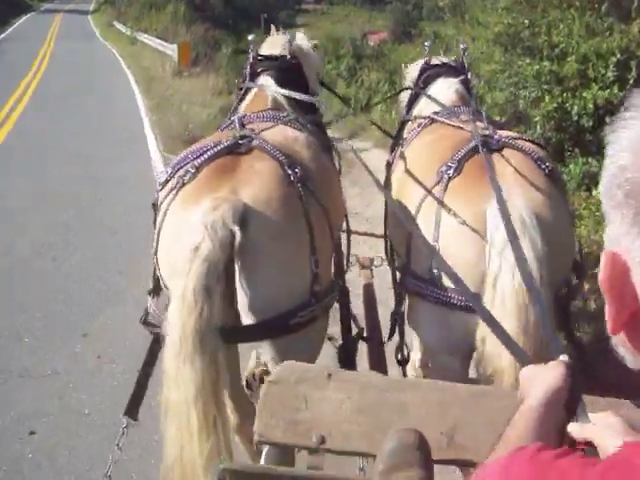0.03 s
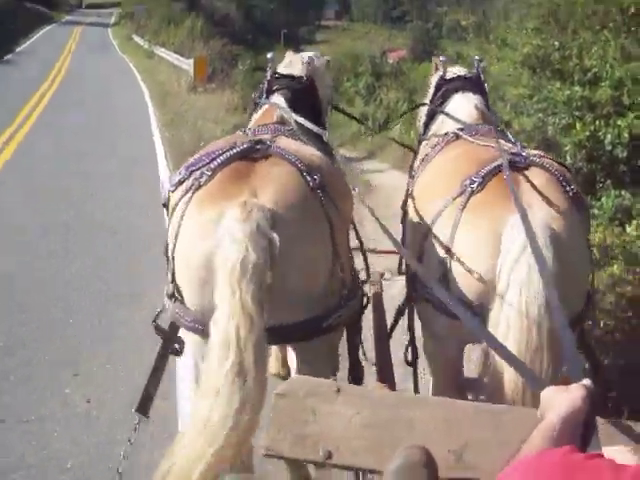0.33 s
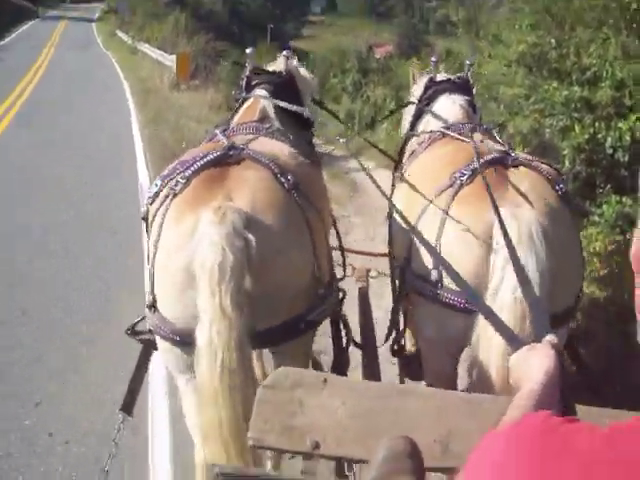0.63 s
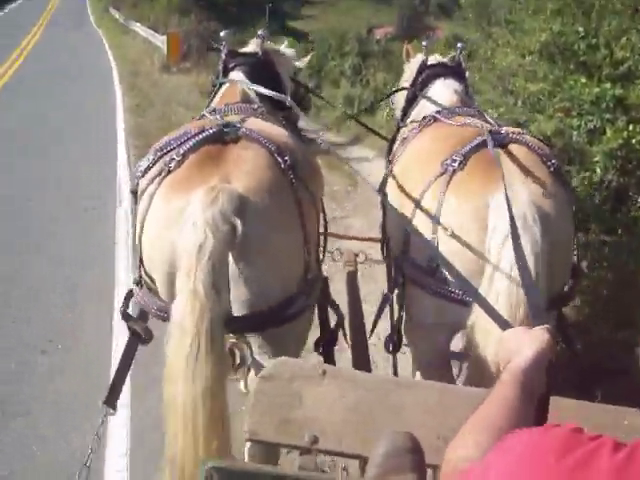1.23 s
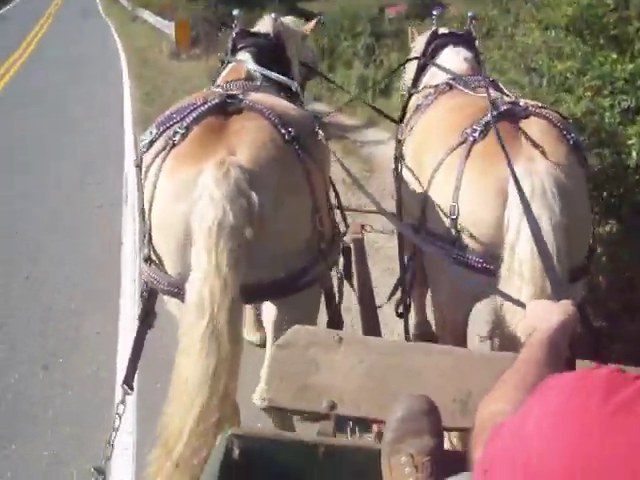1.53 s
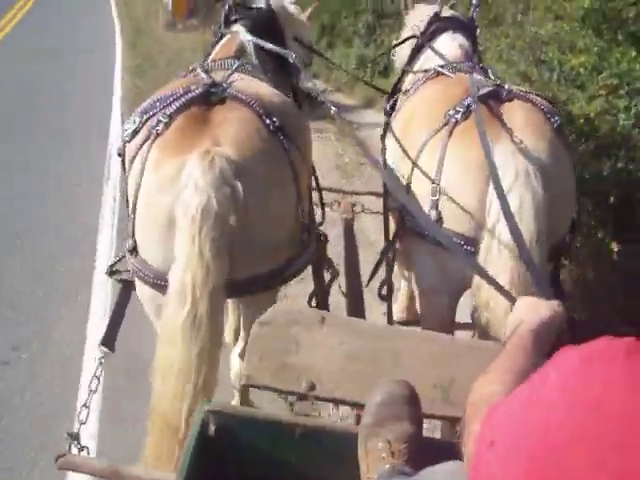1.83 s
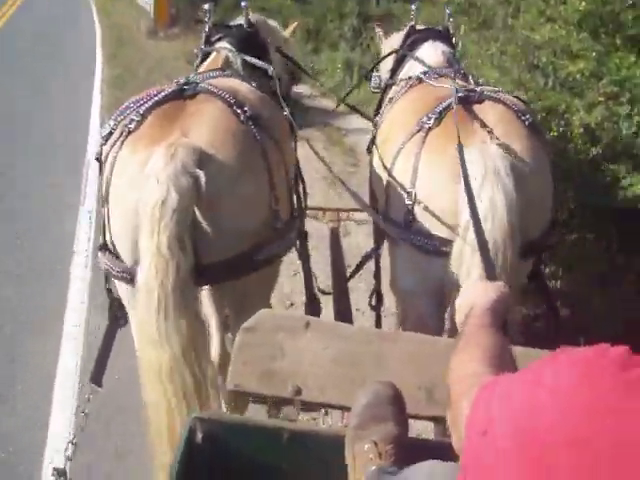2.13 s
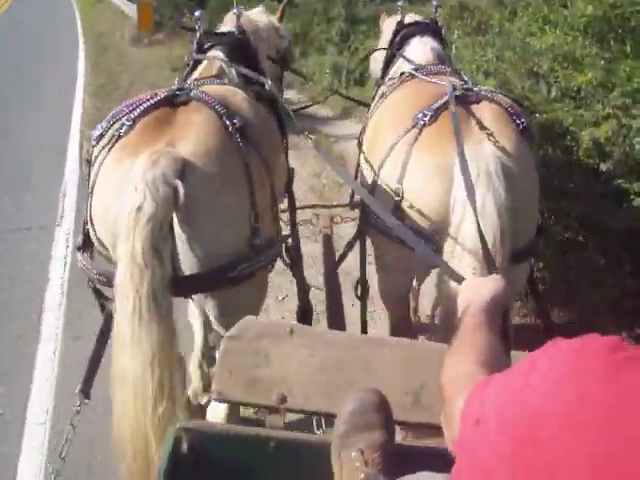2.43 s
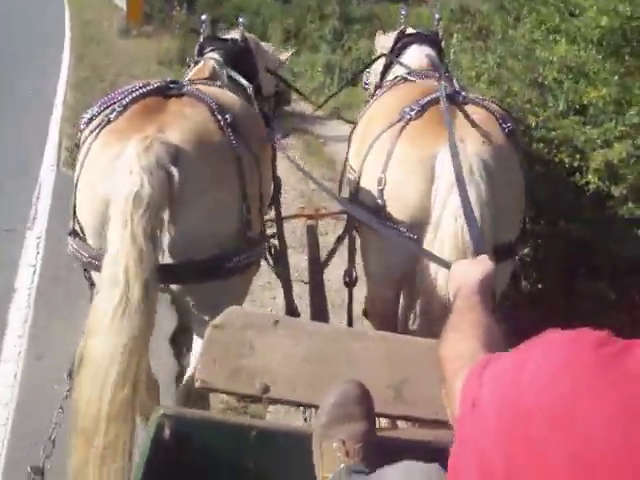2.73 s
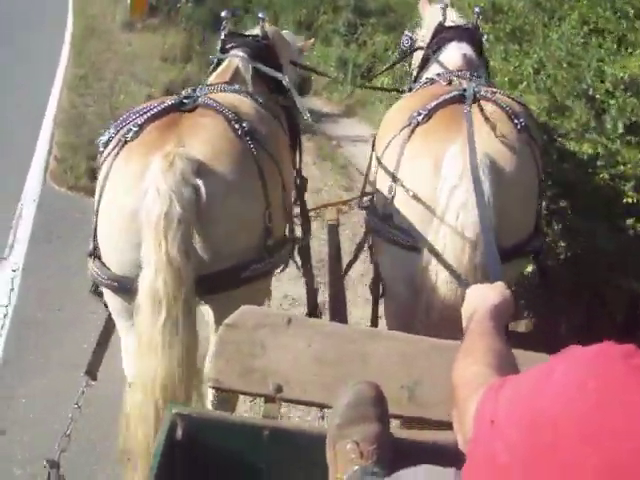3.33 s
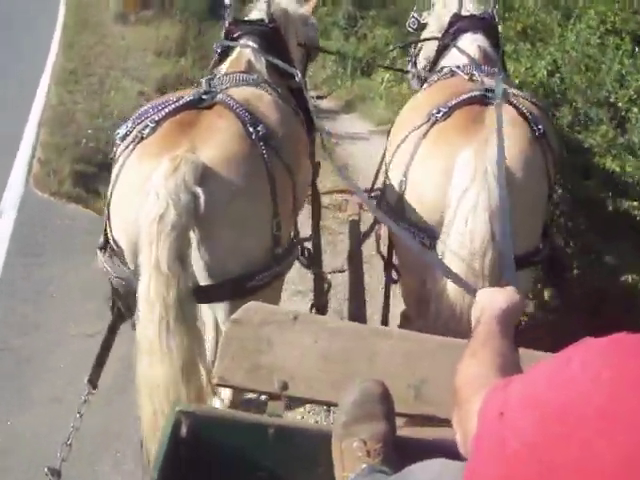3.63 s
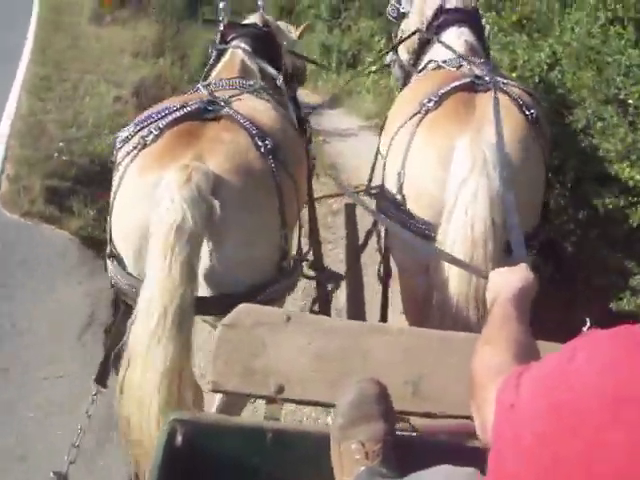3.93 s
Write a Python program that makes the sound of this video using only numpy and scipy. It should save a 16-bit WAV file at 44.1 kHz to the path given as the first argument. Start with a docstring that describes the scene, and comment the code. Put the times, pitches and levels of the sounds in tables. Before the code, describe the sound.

A wagon hitch clatters unevenly, sharp iron clacks alternating with duller wooden knocks, as two horses pull along a gravel track. Gritty wheels, low thuds, scattered clops and faint chain jingling continue, with wind on the microphone at the seat.

```python
"""A wooden wagon, drawn by two horses off a road onto a gravel track, heard from the seat.
The loose hitch and its chains clack hard one way and knock back more dully. Wheels crunch grit;
bumps rumble the boards and jolts boom the bed. Hooves, stones and fittings clop,
harness chains shiver, and wind buffets the microphone."""
import sys
import numpy as np
from scipy import signal
from scipy.fft import rfft, irfft
from scipy.io import wavfile

SR = 44100
rng = np.random.default_rng(int(sys.argv[2]) if len(sys.argv) > 2 else 0)


def wav_out(sig):
    """Save sig, one row per channel (or a flat mono array), as 16-bit PCM at SR to the path in sys.argv[1]."""
    wavfile.write(sys.argv[1], SR, np.round(np.clip(np.atleast_2d(sig).T, -1, 1) * 32767).astype(np.int16))


N = 176400

# Levels are relative; each source adds its own offset.
# bumps in the track: start_s, length_s, rumble_db, crunch_db
BUMPS = [(0.237, 0.062, -26, -24.5), (0.288, 0.017, -15, -24), (0.35, 0.043, -20.5, -21),
         (0.428, 0.044, -21.5, -32.5), (0.674, 0.037, -60, -24), (1.141, 0.086, -18.5, -27),
         (1.238, 0.071, -24, -33.5), (1.318, 0.05, -18, -20), (1.38, 0.024, -21, -19),
         (1.495, 0.07, -23, -25.5), (1.795, 0.046, -45, -26.5), (1.935, 0.051, -24, -22),
         (2.007, 0.024, -23.5, -24), (2.118, 0.035, -26, -23.5), (2.414, 0.053, -24.5, -26),
         (3.303, 0.09, -34, -28.5), (3.42, 0.078, -19, -26.5)]
# hooves, stones and harness fittings: start_s, pitch_hz, level_db
CLOPS = [(0.169, 710, -34), (1.55, 1480, -21), (2.091, 2550, -15), (2.234, 810, -21), (2.308, 1970, -23),
         (2.663, 573, -15.5), (2.904, 1820, -21), (3.171, 1066, -21), (3.238, 1680, -22.5)]
# blows of the hitch, dull and hard: start_s, iron_db, wood_db
KNOCKS = [(0.327, -37, -16.5), (0.797, -19, -11), (0.832, -21, -18), (0.901, -31.5, -23),
          (0.977, -19, -12.5), (1.112, -20, -12), (1.197, -29, -15.5), (1.297, -27.5, -22),
          (1.424, -22, -16.5), (1.496, -21, -11.5), (1.537, -23.5, -12), (1.788, -30.5, -15.5),
          (2.083, -30, -26), (2.489, -29, -11.5), (2.567, -23, -15), (2.649, -23, -13.5),
          (2.837, -18.5, -15.5), (2.974, -21.5, -14.5), (3.046, -21.5, -14.5), (3.16, -26, -14.5),
          (3.262, -25.5, -28), (3.303, -26, -18), (3.469, -20.5, -18), (3.489, -24.5, -24),
          (3.599, -28, -16), (3.682, -27, -21), (3.923, -28, -16), (3.963, -17, -15)]
CLACKS = [(0.4125, -17.5, -17.5), (0.745, -15, -17), (0.8431, -11, -9.5), (0.929, -10, -12.5),
          (1.0159, -13, -17), (1.1399, -13.5, -16), (1.2155, -17.5, -17.5), (1.3362, -18.5, -18),
          (1.4437, -13.5, -13.5), (1.55, -12, -17.5), (1.7329, -17, -18.5), (1.9104, -15, -20.5),
          (1.9992, -9.5, -13.5), (2.094, -17.5, -18), (2.378, -15, -13), (2.527, -13, -11.5),
          (2.604, -13, -12), (2.6795, -15, -14), (2.797, -14, -13.5), (2.8775, -14, -20),
          (2.9323, -13.5, -13), (3.004, -11.5, -14), (3.2138, -14, -13.5), (3.4498, -13.5, -15),
          (3.517, -19, -15), (3.6098, -14, -15.5), (3.7133, -16.5, -18.5), (3.7728, -18.5, -20),
          (3.867, -19, -17.5), (3.971, -13, -12)]
# hitch resonances: pitch_hz, level_db, t60_s
HITCH_MODES = [(747, -8, 0.086), (941.5, -9, 0.07), (1093, -8.5, 0.061), (1223, -6.5, 0.032),
               (1534, -13.5, 0.059), (1858, -4.5, 0.049), (1914, -11.5, 0.016), (2326, -2.5, 0.046),
               (2434, -6, 0.023), (2854, -0.5, 0.025), (3570, -12.5, 0.037), (4070, -9, 0.045),
               (4538, -6.5, .04), (5705, -15, 0.061)]
# strikes on single links and on the wagon bed: start_s, level_db
LINK_PINGS = [(2.649, -15), (2.84, -17.5), (3.055, -20), (3.414, -17.5)]
BED_THUDS = [(0.637, -10.5), (0.711, -10), (1.05, -10.5), (1.165, -8.5), (1.319, -9.5), (1.547, -16.5),
             (1.952, -10.5), (3.48, -18), (3.909, -12)]
# envelopes of wheels, wind and chains: time_s, level_db
ROLLING_LEVEL = [(0, -35.5), (.22, -35), (.3, -24), (.6, -34), (.78, -28), (1.05, -26.5), (1.46, -27.5),
                 (1.68, -27), (1.77, -35), (1.84, -30), (1.98, -20), (2.25, -32), (2.66, -27.5),
                 (2.76, -31), (2.85, -24), (3.57, -27), (4, -24.5)]
WIND_LEVEL = [(0, -26), (.14, -34), (.4, -23.5), (.58, -30), (.9, -26), (1.2, -24.5), (1.68, -28),
              (1.77, -36.5), (1.86, -28.5), (1.97, -21), (2.3, -29), (3.05, -25.5), (3.3, -29), (4, -23.5)]
SHIVER_LEVEL = [(0, -51), (.6, -44.5), (1.1, -44), (1.48, -45), (1.66, -44), (1.77, -48), (1.95, -37),
                (2.25, -42), (2.75, -50.5), (2.85, -46), (4, -41.5)]
# spectra of gravel, boards, wind and harness chains: freq_hz, density_db
CRUNCH_SPECTRUM = [(250, -14.5), (520, -3), (720, -1), (1400, -6), (1850, -5), (2300, -10), (3050, -19.5),
                   (4300, -26), (5700, -26), (6500, -47.5)]
RUMBLE_SPECTRUM = [(60, -12.5), (110, 2), (170, -3), (265, -1), (340, -4.5), (420, -10.5), (540, -8.5),
                   (800, -34.5)]
WIND_SPECTRUM = [(15, -8), (27, 1), (50, 1), (86, 3.5), (110, -3.5), (150, -10), (250, -15.5), (600, -53.5)]
SHIVER_SPECTRUM = [(3000, -7.5), (3700, -1.5), (5600, -2), (6500, -7.5)]
# dense ring of the hitch's chain, wood and iron: freq_hz, density_db
CHAIN_SPECTRUM = [(1500, 1), (2200, 4), (2800, -5), (3100, -5), (3650, 5), (4900, -2), (5600, -3.5),
                  (6400, -33.5)]
WOOD_SPECTRUM = [(300, -5), (520, -2), (1100, -2), (1380, -5.5), (1600, -4), (1900, 1.5), (2300, -9),
                 (3000, -14)]
IRON_SPECTRUM = [(1500, -26), (2250, 1), (2800, 3.5), (3050, -20.5), (3400, -4.5), (4550, -6),
                 (5100, -10.5), (5650, -11.5), (6400, -25.5)]


def from_db(db):
    """Decibels to gain."""
    return 10 ** (np.asarray(db) / 20)


def rms_one(x):
    """Scale to rms 1."""
    return x / np.sqrt(np.mean(x ** 2) + 1e-20)


def level(rows):
    """Gain curve from rows of time_s, level_db."""
    return from_db(np.interp(np.arange(N) / SR, *np.transpose(rows)))


def colour(x, spectrum):
    """Shape by rows of freq_hz, density_db; 12 dB/octave skirts; rms 1."""
    hz, db = np.transpose(spectrum)
    bins_hz = np.maximum(np.fft.rfftfreq(N, 1 / SR), 1)
    gain = from_db(np.interp(np.log(bins_hz), np.log(hz), db))
    skirts = np.minimum(1, bins_hz / hz[0]) * np.minimum(1, hz[-1] / bins_hz)
    return rms_one(irfft(rfft(x) * gain * skirts ** 2, N))


def noise(spectrum):
    """Coloured noise; rms 1."""
    return colour(rng.standard_normal(N), spectrum)


def bursts(starts_s, levels_db, hold_s, attack_s, t60_s):
    """Rise-hold-decay envelopes, summed in power."""
    power = np.zeros(N + SR)
    t = np.arange(SR // 2) / SR
    for start, hold, db in zip(starts_s, np.broadcast_to(hold_s, len(starts_s)), levels_db):
        rise = np.minimum(t / attack_s, 1)
        decay = np.exp(-np.log(1000) * np.maximum(t - hold, 0) / t60_s)
        power[int(start * SR):][:len(t)] += (from_db(db) * rise * decay) ** 2
    return np.sqrt(power[:N])


def ring(starts_s, gains, pitch_hz, t60_s):
    """One damped mode struck by clicks."""
    clicks = np.full(N + SR, 1e-18)
    np.add.at(clicks, (starts_s * SR).astype(int), gains)
    radius = np.exp(-np.log(1000) / (t60_s * SR))
    angle = 2 * np.pi * pitch_hz / SR
    return signal.lfilter([0, np.sin(angle)], [1, -2 * radius * np.cos(angle), radius ** 2], clicks[:N])


def grains(rate_per_s, t60_cycles, low_hz, high_hz, pitches):
    """Small random impacts, each ringing at one of many pitches; rms 1."""
    out, slot_samples, spread_db = 0, 16, 3
    for hz in np.geomspace(low_hz, high_hz, pitches):
        chance, size, sign = rng.random((3, N // slot_samples))
        hits = np.flatnonzero(chance < rate_per_s * slot_samples / (pitches * SR))
        size_db = spread_db * np.minimum(-np.log(1 - size[hits]), 3.5)
        gains = np.sign(sign[hits] - .5) * from_db(size_db)
        out += hz * ring(hits * slot_samples / SR, gains, hz, t60_cycles / hz)
    return rms_one(out)


def wheels():
    """Grit cracks, sand crushes, boards rumble; harder at bumps. Stones give way in clumps."""
    starts_s, length_s, rumble_db, crunch_db = np.transpose(BUMPS)
    stones = grains(rate_per_s=2500, t60_cycles=22.3, low_hz=421, high_hz=5580, pitches=48)
    sand = from_db(-7.5) * noise(CRUNCH_SPECTRUM)
    gravel = rms_one(colour(stones, CRUNCH_SPECTRUM) + sand)
    board_hits = grains(rate_per_s=900, t60_cycles=14.8, low_hz=102.7, high_hz=766, pitches=32)
    boards = colour(board_hits, RUMBLE_SPECTRUM)
    rolling = level(ROLLING_LEVEL)
    bump_shape = dict(hold_s=length_s, attack_s=0.0023, t60_s=0.12)
    crunch = np.hypot(from_db(-3.5) * rolling, bursts(starts_s, crunch_db, **bump_shape))
    rumble = np.hypot(rolling, bursts(starts_s, rumble_db, **bump_shape))
    clump_db = 1.43 * noise([(30, -0.5), (120, -11)])
    return rms_one(from_db(clump_db)) * (crunch * gravel + rumble * boards)


def wind():
    """Low, lumpy buffeting on the microphone."""
    lump_db = 1.5 * noise([(4, -7), (25, -6.5)])
    return from_db(2) * level(WIND_LEVEL) * rms_one(from_db(lump_db)) * noise(WIND_SPECTRUM)


def harness_chains():
    """Chains shiver with the ride; single links ring out."""
    starts_s, level_db = np.transpose(LINK_PINGS)
    links = grains(rate_per_s=2000, t60_cycles=110, low_hz=3473, high_hz=6200, pitches=24)
    shiver = level(SHIVER_LEVEL) * colour(links, SHIVER_SPECTRUM)
    return shiver + ring(starts_s, from_db(level_db), pitch_hz=4080, t60_s=0.046)


def clops():
    """Hooves, stones and fittings: one short, hollow, narrow-band ring each."""
    out = np.zeros(N)
    for start_s, pitch_hz, level_db in CLOPS:
        envelope = bursts([start_s], [level_db], hold_s=0.0094, attack_s=0.0037, t60_s=0.045)
        out += envelope * noise([(pitch_hz / 1.85, -22), (pitch_hz, 0), (pitch_hz * 1.2, -22)])
    return out


def hitch_modes(starts_s, iron_db, wood_db, wood_lag_s, bounce_s, bounce_db, spread_db):
    """Blow and bounce strike each mode; wood answers late. Pitch shifts with the strike point."""
    wood_below_hz, detune_ratio = 2100, 0.0096
    out = np.zeros(N + SR)
    t = np.arange(SR // 10) / SR
    for k, (mode_hz, mode_db, t60_s) in enumerate(HITCH_MODES):
        strength, lag, bounce, shift = rng.standard_normal((len(starts_s), 4)).T
        wooden = mode_hz < wood_below_hz
        blows_s = starts_s + wooden * wood_lag_s * (1 + np.tanh(lag))
        rebounds_s = blows_s + bounce_s * (1 + .5 * np.tanh(bounce))
        gains = (-1) ** k * from_db((wood_db if wooden else iron_db) + mode_db + spread_db * strength)
        pitches_hz = mode_hz * (1 + detune_ratio * shift)
        decay = np.exp(-np.log(1000) * t / t60_s)
        for blow_s, rebound_s, gain, hz in zip(blows_s, rebounds_s, gains, pitches_hz):
            tone = gain * decay * np.sin(2 * np.pi * hz * t)
            out[int(blow_s * SR):][:len(t)] += tone
            out[int(rebound_s * SR):][:len(t)] += from_db(bounce_db) * tone
    return out[:N]


def hitch_knocks():
    """Hitch and chain swing back: a softer, longer, woodier chatter."""
    starts_s, iron_db, wood_db = np.transpose(KNOCKS)
    modes = hitch_modes(starts_s, iron_db - 0.5, wood_db - 3.5,
                        wood_lag_s=0.00256, bounce_s=0.0065, bounce_db=-6.5, spread_db=3)
    chain = bursts(starts_s, iron_db + 0.5, hold_s=0.0048, attack_s=0.002, t60_s=0.03)
    wood = bursts(starts_s, wood_db - 6, hold_s=0.009, attack_s=0.0012, t60_s=0.061)
    return modes + chain * noise(CHAIN_SPECTRUM) + wood * noise(WOOD_SPECTRUM)


def hitch_clacks():
    """Iron on iron: sudden crack, clear modes, short wooden tail."""
    starts_s, iron_db, wood_db = np.transpose(CLACKS)
    modes = hitch_modes(starts_s, iron_db - 0.8, wood_db + 0.5,
                        wood_lag_s=0.00206, bounce_s=0.0062, bounce_db=-14.5, spread_db=2.5)
    crack = bursts(starts_s, iron_db + 1, hold_s=0.00098, attack_s=0.0001, t60_s=0.0087)
    tail = bursts(starts_s, iron_db - 7, hold_s=0.0053, attack_s=0.00032, t60_s=0.048)
    iron = np.hypot(crack, tail) * noise(IRON_SPECTRUM)
    wood = bursts(starts_s, wood_db - 7, hold_s=0.011, attack_s=0.002, t60_s=0.033)
    return dull_weak_blows(modes + iron, starts_s, iron_db) + wood * noise(WOOD_SPECTRUM)


def dull_weak_blows(x, starts_s, blow_db):
    """Blows below full strength lose treble."""
    crossover_hz, full_blow_db, slope_db_per_db = 4900, -11.5, 2.4
    filters = (signal.butter(2, crossover_hz, kind, fs=SR, output="sos") for kind in ("low", "high"))
    low, treble = (signal.sosfilt(np.tile(sos, (2, 1)), x) for sos in filters)
    treble_db = slope_db_per_db * np.minimum(blow_db - full_blow_db, 0)
    latest_blow = np.maximum(np.searchsorted(starts_s, np.arange(1, N + 1) / SR) - 1, 0)
    return low + from_db(treble_db)[latest_blow] * treble


def bed_thuds():
    """Jolts ring one low mode of the wagon bed."""
    starts_s, level_db = np.transpose(BED_THUDS)
    return ring(starts_s, from_db(level_db), pitch_hz=88.3, t60_s=0.17)


def scene():
    """Mono mix at the seat."""
    hitch = hitch_clacks() + hitch_knocks()
    return (hitch + clops() + harness_chains() + bed_thuds() + wheels() + wind())[None]


def record(dry):
    """Microphone dulls treble and clips peaks; the hardest clacks clip again with a bright snap."""
    mic_top_hz, edge_hz, cutoff_hz, clip_level = 6040, 6550, 16000, .72
    dull = signal.sosfilt(signal.butter(6, mic_top_hz, fs=SR, output="sos"), dry)
    flattened = np.clip(dull, -clip_level, clip_level)
    narrow = signal.sosfilt(signal.ellip(10, .2, 70, edge_hz, fs=SR, output="sos"), flattened)
    snapped = np.clip(narrow, -clip_level, clip_level)
    return signal.sosfilt(signal.butter(20, cutoff_hz, fs=SR, output="sos"), snapped)


dry = scene()
out = record(dry)
wav_out(out)
```